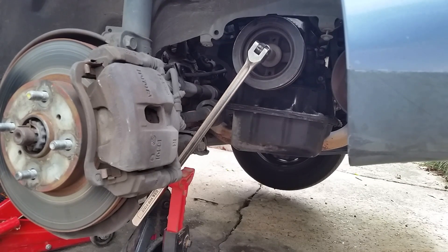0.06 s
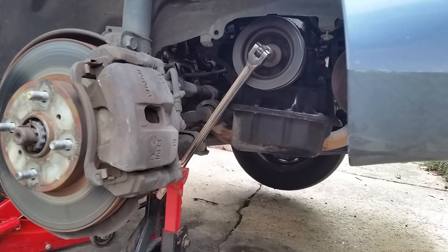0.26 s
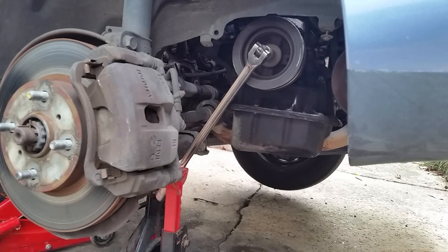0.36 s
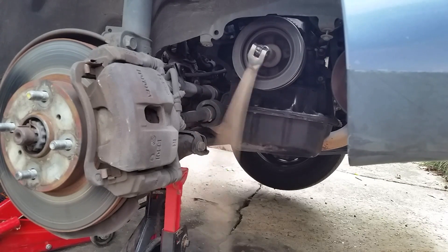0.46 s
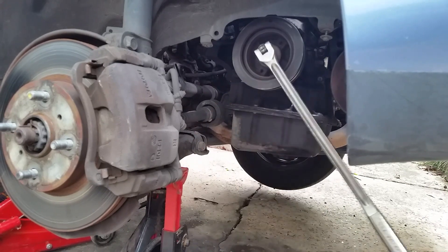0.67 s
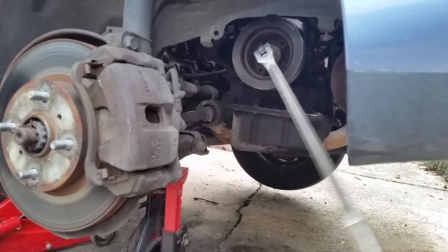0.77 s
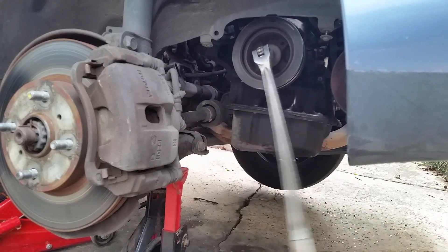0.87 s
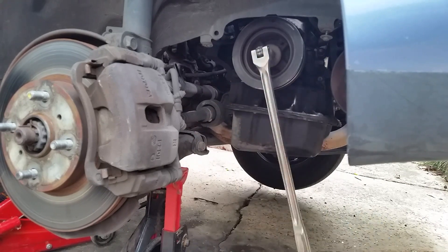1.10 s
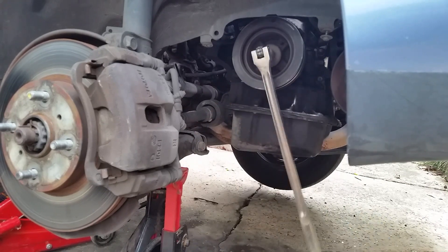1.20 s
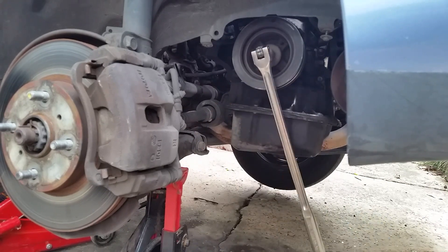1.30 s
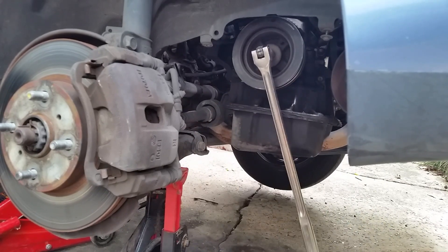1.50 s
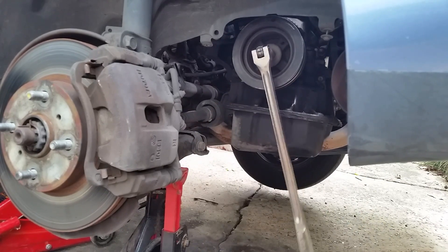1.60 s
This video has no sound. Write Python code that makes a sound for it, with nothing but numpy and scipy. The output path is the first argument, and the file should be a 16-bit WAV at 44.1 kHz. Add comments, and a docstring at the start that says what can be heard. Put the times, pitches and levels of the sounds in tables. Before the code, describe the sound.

Loud, ringing metal bang with a short starter motor grind, then one lighter clack.

```python
"""Starter bump on a crank bolt

A starter is bumped to crack a crank bolt loose with a breaker bar, in an open garage. It clacks in,
the bar slams against the suspension and rings, the gear teeth grind and make the engine block boom.
The freed bar groans as it swings, clacks once and dangles. Rumble, hiss and a distant hum lie beneath;
gain control ducks everything after the bang."""
import sys
import numpy as np
from scipy import signal
from scipy.fft import rfft, irfft
from scipy.io import wavfile
from scipy.ndimage import uniform_filter1d, minimum_filter1d

SR = 44100
rng = np.random.default_rng(int(sys.argv[2]) if len(sys.argv) > 2 else 0)


def materialize(psi):
    """Save the field psi as 16-bit PCM at rate SR to the path in sys.argv[1].

    A 1-D psi becomes a single channel; in a 2-D psi each row is a channel.
    """
    bounded = np.clip(np.atleast_2d(psi).T, -1, 1)
    quanta = np.round(bounded * 32767).astype(np.int16)
    wavfile.write(sys.argv[1], SR, quanta)


N = 72765
T = np.arange(N) / SR
HZ = np.fft.rfftfreq(2 * N, 1 / SR)

# left-right coherence of the microphones: f/Hz, coherence
COHERENCE = [(150, 0.98), (500, 0.8), (1000, 0.49), (1800, 0.42), (3000, 0.23), (6000, 0), (16000, 0.014)]


def amp(db):
    """dB to gain."""
    return 10 ** (np.asarray(db) / 20)


def unit_rms(x):
    """Scale to rms 1."""
    return x / np.sqrt(np.mean(x ** 2) + 1e-20)


def at_hz(table, hz=HZ, column=1):
    """Table column interpolated over log frequency."""
    columns = np.transpose(table)
    return np.interp(np.log(hz + 1), np.log(columns[0] + 1), columns[column])


def envelope(table, column=1):
    """Gain over time from a dB column, silent outside its span."""
    columns = np.transpose(table)
    return amp(np.interp(T, columns[0], columns[column], left=-150, right=-150))


def low_cut(hz):
    """Gain of a 4th-order high-pass."""
    return 1 / np.sqrt(1 + (hz / (HZ + 1)) ** 8)


def filtered(x, gain):
    """Apply a gain per frequency."""
    return irfft(rfft(x, 2 * N) * gain)[..., :N]


def convolve(x, response):
    """Apply an impulse response."""
    return filtered(x, rfft(response, 2 * N))


def stereo_noise():
    """White noise at two microphones, coherent in the bass."""
    left, other = rng.standard_normal((2, N))
    coherence = np.clip(at_hz(COHERENCE), -1, 1)
    right = filtered(left, coherence) + filtered(other, np.sqrt(1 - coherence ** 2))
    return np.array([left, right])


def wander(rate_hz):
    """Slow random drift, rms 1."""
    return unit_rms(filtered(rng.standard_normal(N), np.exp(-(HZ / rate_hz) ** 2)))


def ringing(modes):
    """Decaying modes at random phase; higher ones reach the two microphones out of step."""
    out, t = np.zeros((2, N)), T[:SR]
    for k, (hz, db, t60_s) in enumerate(modes):
        lag_rad = (-1) ** k * np.arccos(np.clip(at_hz(COHERENCE, hz), -1, 1))
        phase = 2 * np.pi * (hz * t + rng.random()) + np.array([[0], [lag_rad]])
        out[:, :SR] += amp(db) * 1000 ** (-t / t60_s) * np.sin(phase)
    return out


def background():
    """Outdoor rumble that swells as the engine shudders, and hiss peaking in each microphone port."""
    # noise floor: f/Hz, left density/dB, right density/dB
    floor = [(20, -85.5, -77), (70, -65.5, -65.5), (160, -69.5, -68), (320, -78.5, -77), (520, -83, -86.5),
             (1100, -88, -92.5), (2600, -94.5, -97), (3660, -93.5, -104), (4320, -80.5, -106),
             (4500, -82, -107), (5380, -90, -109), (6350, -100, -111), (8100, -104, -110),
             (9240, -90.5, -90), (9580, -88, -84.5), (10140, -80, -69.5), (11140, -86.5, -79.5),
             (11290, -102, -89.5), (12200, -110, -105), (16000, -105, -105)]
    # rumble swell: t/s, gain/dB
    swell = [(0, 1.5), (.1, 0.5), (.2, -2), (.26, 15.5), (.38, 17.5), (.47, 4.5), (.62, 3), (.95, 3.5),
             (1.1, 2.5), (1.3, 2.5), (1.43, -0.5), (1.49, 9), (1.57, -0.5), (1.66, 2.5)]
    density = amp([at_hz(floor, column=1), at_hz(floor, column=2)])
    air = filtered(stereo_noise(), density * np.sqrt(SR / 2))
    rumble = filtered(air, np.exp(-(HZ / 550) ** 2))
    swell_gain = amp(np.interp(T, *np.transpose(swell)))
    return air + rumble * (swell_gain - 1)


def distant_machine():
    """Faint hum of two slightly wavering tones."""
    # hum partials: f/Hz, level/dB
    partials = [(786, -63.5), (1572, -67)]
    hum = np.zeros(N)
    for hz, db in partials:
        wavering_hz = hz * (1 + 0.0096 * wander(rate_hz=36))
        hum += amp(db) * np.sqrt(2) * np.sin(2 * np.pi * np.cumsum(wavering_hz) / SR)
    return hum


def starter():
    """Gear teeth knock the block and rasp under load, then the drive coasts with a duller rattle."""
    # engine block and subframe modes: f/Hz, level/dB, t60/s
    block_modes = [(228, 0.5, 0.18), (300, -3, 0.041), (411, -1.5, 0.094), (515, -5, 0.059),
                   (642.5, 1.5, .1), (736.4, -2.5, 0.044), (944, -3.5, 0.12), (1393, -4.5, .12),
                   (1700, -7.5, 0.043)]
    # starter load: t/s, boom level/dB, grind level/dB
    load = [(.218, -55.5, -37), (.228, -27, -5), (.262, -18.5, -19.5), (.282, -8, -7.5), (.303, -5.5, -7),
            (.32, -11.5, -7.5), (.338, -12, -8.5), (.352, -19.5, -14), (.37, -15, -10), (.40, -27, -17),
            (.435, -38.5, -32.5), (.475, -33.5, -60), (.515, -30.5, -29.5), (.57, -57, -27.5),
            (.62, -51.5, -32), (.68, -56, -38.5), (.8, -92.5, -79)]
    # gear grind: f/Hz, density/dB
    grind_spectrum = [(150, -6.5), (400, -9), (800, 1), (1200, -3), (2000, 1), (3000, 0.5), (5000, -2.5),
                      (7000, -6.5), (9000, -3.5), (10700, -1.5), (12500, -5.5), (16000, -19.5)]
    # coasting rattle: t/s, level/dB
    coast = [(.46, -44.5), (.5, -27.5), (.53, -27.5), (.575, -33.5), (.62, -52), (.7, -47.5)]
    # coasting rattle: f/Hz, density/dB
    coast_spectrum = [(150, -52), (228, 19), (320, -3.5), (700, -14), (1000, 17), (1230, -5), (1550, 5.5),
                      (1800, 5), (2050, 4), (2350, 0), (3200, 3.5), (4200, -28), (7000, -28), (16000, -21)]
    tooth_hz, jitter, spread_db, decay_cycles = 159.8, 0.15, 2, 0.23
    highpass = low_cut(hz=215)

    teeth = np.cumsum(tooth_hz * (1 + jitter * wander(tooth_hz / 2))) / SR
    contact = np.diff(np.floor(teeth), prepend=0) > 0
    knocks = unit_rms(contact * amp(-spread_db * rng.standard_normal(N)))
    block = ringing(block_modes)
    block /= np.linalg.norm(block[0])
    boom = filtered(convolve(knocks * envelope(load, column=1), block), highpass)

    mesh = 1 + np.exp(-(teeth % 1) / decay_cycles)  # surge at each tooth
    grind = filtered(stereo_noise(), amp(at_hz(grind_spectrum)) * highpass) * mesh
    rattle = filtered(stereo_noise(), amp(at_hz(coast_spectrum))) * mesh
    return boom + unit_rms(grind) * envelope(load, column=2) + unit_rms(rattle) * envelope(coast)


def bar_blows():
    """Steel on steel: each blow is a clank and a burst of clatter that sets the bar ringing."""
    # blows: t/s, level/dB, clatter t60/s, tilt/(dB/octave), clank f/Hz, clank level/dB re blow
    blows = [(.2185, -21, 0.057, 0.5, 1070, -13), (.2222, 7, 0.071, .5, 2410, -22.5),
             (.2335, 1.5, 0.036, -7.5, 1006, -10.5), (0.2564, -2.5, 0.067, -5.5, 1873, -10),
             (0.2704, 13, 0.064, 0.06, 1991, -11.5), (0.298, -0.5, 0.14, 1.5, 672, -4.5),
             (0.65, -17, 0.11, 1.2, 1004, -11), (.838, -43, 0.18, -3, 797, 0.5),
             (1.067, -37.5, 0.061, 4, 1962, -18), (1.262, -60, 0.094, -7.5, 2190, -6.5)]
    # clatter of the struck parts: f/Hz, density/dB
    clatter_spectrum = [(100, -3), (400, -18.5), (900, -13), (1250, -7.5), (2000, -1), (2900, -8),
                        (3900, 0.5), (5200, -5), (6100, 2.5), (7000, -0.5), (8250, 4.5), (9050, 1),
                        (9600, 4.5), (10400, 5.5), (11600, 5), (12900, -0.5), (13500, -2.5), (16000, -7.5)]
    # bar and socket modes: f/Hz, level/dB, t60/s
    bar_modes = [(1005, -22, .6), (2040, -15, .45), (2107, -10, .25), (2865, -10, .35), (3510, -9, .15),
                 (3750, -3, .11), (4283, -6, .12), (4753, -29, .7), (5850, -3, .08), (6230, -4, .08),
                 (6626, -9, .18), (7578, -7, .13), (8155, 1, .11), (8340, 1, .17), (8426, -5, .14),
                 (9515, -8, .17), (9686, -6, .18), (10141, -3, .17), (10376, 2, .15), (11500, 1, .08),
                 (12952, -4, .16)]
    attack_s, clank_t60_s, ring_db = 0.00024, 0.088, -17

    out, bar = np.zeros((2, N)), ringing(bar_modes)
    grid_hz = np.arange(0, SR / 2, 110)
    ripple_db = 2 * np.interp(HZ, grid_hz, rng.standard_normal(len(grid_hz)))
    body = amp(at_hz(clatter_spectrum) + ripple_db) * low_cut(hz=413)
    attack = 1 - np.exp(-T / attack_s)
    for start_s, db, t60_s, tilt_db_per_oct, clank_hz, clank_db in blows:
        tilt = amp(tilt_db_per_oct * np.log2(np.maximum(HZ, 1500) / 6000))
        clatter = unit_rms(filtered(stereo_noise(), body * tilt)) * 1000 ** (-T / t60_s)
        phase_shift = np.exp(2j * np.pi * rng.random())
        ring = amp(ring_db) * filtered(bar, unit_rms(tilt) * phase_shift)
        clank = ringing([(clank_hz, clank_db, clank_t60_s)])
        out += delayed(amp(db) * attack * (clatter + ring + clank), start_s)
    return out


def delayed(sound, start_s):
    """Stereo sound shifted to start at start_s."""
    return np.pad(sound, ((0, 0), (round(start_s * SR), 0)))[:, :N]


def floor_bounce(x):
    """One dulled reflection off the concrete floor."""
    delay_s, gain_db, cutoff_hz = 0.0082, -7.5, 9000
    return amp(gain_db) * filtered(x, np.exp(-2j * np.pi * HZ * delay_s) / (1 + 1j * HZ / cutoff_hz))


def garage_reverb(x):
    """Diffuse tail, each band decaying at its own rate."""
    # room decay: f/Hz, t60/s
    decay_times = [(100, 1.47), (500, 1), (1000, 1.26), (4000, 2), (10000, 1.48), (16000, 3.45)]
    # tail spectrum: f/Hz, level/dB
    tail_spectrum = [(100, -9), (700, -18.5), (2000, -25), (5000, -24), (10000, -31), (16000, -26.5)]
    build_s = 0.012
    hz, t, bands = signal.stft(stereo_noise(), SR, nperseg=256)
    t60_s = at_hz(decay_times, hz)[:, None]
    decay = 1000 ** (-t / t60_s) * np.sqrt(2 * np.log(1000) / (t60_s * SR))  # unit energy
    band_gain = amp(at_hz(tail_spectrum, hz))[:, None]
    tail = signal.istft(bands * decay * band_gain, SR, nperseg=256)[1][:, :N]
    return convolve(x, tail * np.minimum(T / build_s, 1))


def bar_swing():
    """Throbbing, half-pitched groan that falls as the whipped bar slows."""
    # groan: t/s, level/dB, centre f/Hz
    groan = [(0.441, -61, 930), (0.464, -30, 917), (0.479, -34, 876), (0.49, -21, 886), (0.51, -21, 813),
             (0.537, -31, 809), (0.573, -37.5, 712), (.62, -59, 662)]
    half_width_hz, tone_gain, throb_hz, throb_depth = 210, 1.2, 87, 0.5
    times_s, _, centre_hz = np.transpose(groan)
    carrier = np.exp(2j * np.pi * np.cumsum(np.interp(T, times_s, centre_hz)) / SR)
    band = np.exp(-(HZ / half_width_hz) ** 4)
    fuzz = unit_rms(filtered(stereo_noise(), band)) + 1j * unit_rms(filtered(stereo_noise(), band))
    throb = 1 + throb_depth * np.cos(2 * np.pi * throb_hz * (T - 0.5))
    return unit_rms((carrier * (fuzz + tone_gain)).real * throb) * envelope(groan)


def bar_clinks():
    """The dangling bar clinks lightly, one mode per touch."""
    # clinks: t/s, f/Hz, level/dB, t60/s
    clinks = [(.751, 4840, -42, .12), (0.833, 4780, -44, 0.21)]
    return sum(delayed(ringing([mode]), start_s) for start_s, *mode in clinks)


def microphone_ports(x):
    """Two unlike ports lean each frequency left or right at constant power."""
    # port imbalance: f/Hz, left minus right/dB
    imbalance = [(200, -.5), (700, 1), (1200, 1.5), (2200, 2.5), (3200, 4), (3900, 10), (5500, 15),
                 (8200, 9.5), (9500, -1), (10500, -6), (13000, -13.5), (16000, 11.5)]
    ratio = amp(at_hz(imbalance))
    gains = np.array([ratio, np.ones_like(ratio)]) * np.sqrt(2 / (1 + ratio ** 2))
    return filtered(x, gains)


def scene():
    """Bar and starter in the garage, over the background."""
    steel = bar_blows() + bar_clinks()
    car = amp(db=2) * (steel + floor_bounce(steel) + starter() + bar_swing())
    return microphone_ports(car + garage_reverb(car)) + background() + distant_machine()


def record(dry):
    """Gain control drops at once, holds and recovers slowly; soft overload; band limit."""
    threshold_db, max_duck_db, hold_s, recovery_db_per_s = -16.5, 18.5, 0.87, 30.5
    cutoff_hz = 15900
    power_db = 10 * np.log10(abs(uniform_filter1d((dry ** 2).mean(0), size=200)) + 1e-12)
    over_db = np.clip(power_db - threshold_db, 0, max_duck_db)
    half_hold = int(hold_s * SR / 2)
    # maximum over the past hold_s
    held_db = -minimum_filter1d(-over_db, 2 * half_hold + 1, origin=half_hold, mode="constant")
    ramp_db = recovery_db_per_s * T
    duck_db = np.maximum.accumulate(held_db + ramp_db) - ramp_db
    ducked = dry / amp(uniform_filter1d(duck_db, size=100))
    lowpass = signal.firwin(511, cutoff_hz, window=("kaiser", 9), fs=SR)
    return signal.oaconvolve(np.tanh(ducked), lowpass[None], "same")


dry = scene()
out = record(dry)
materialize(out)
```